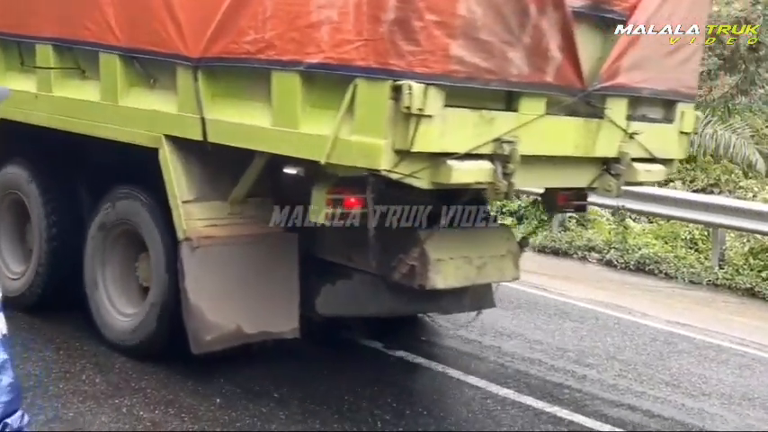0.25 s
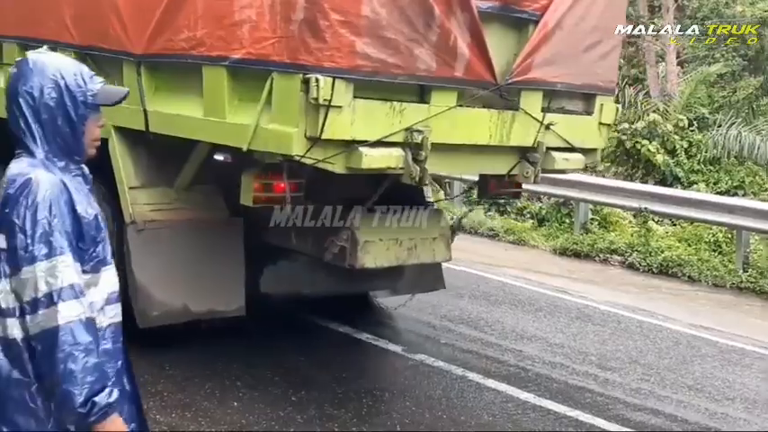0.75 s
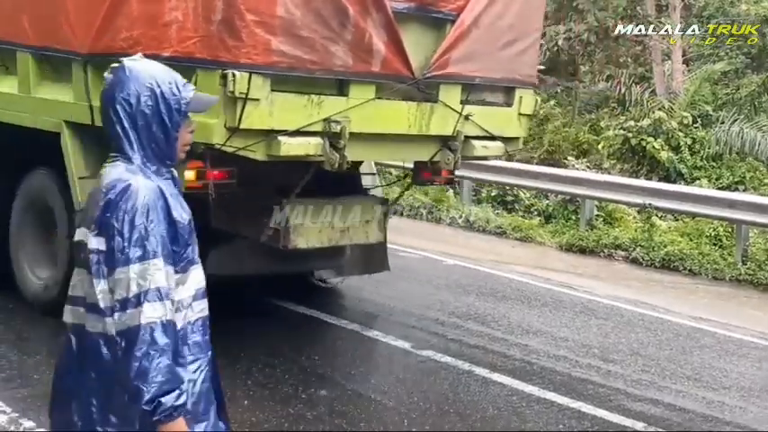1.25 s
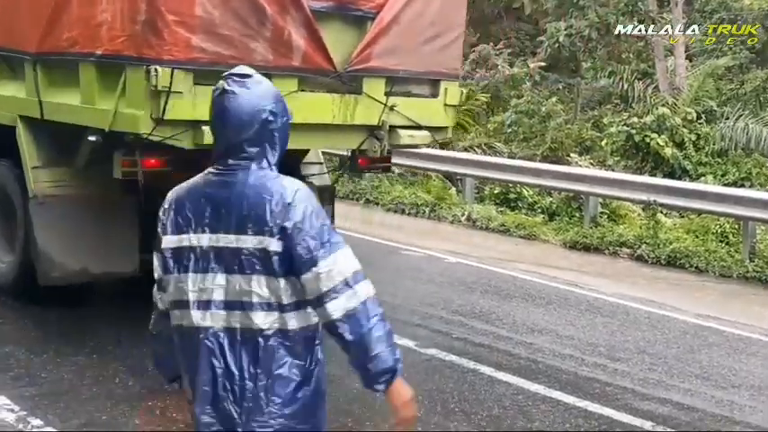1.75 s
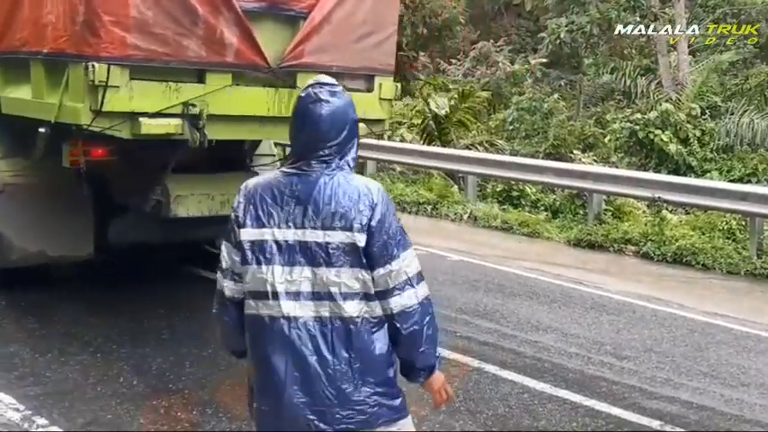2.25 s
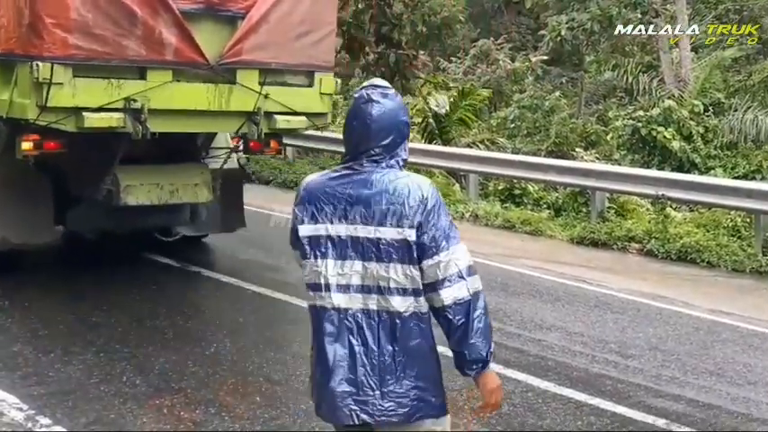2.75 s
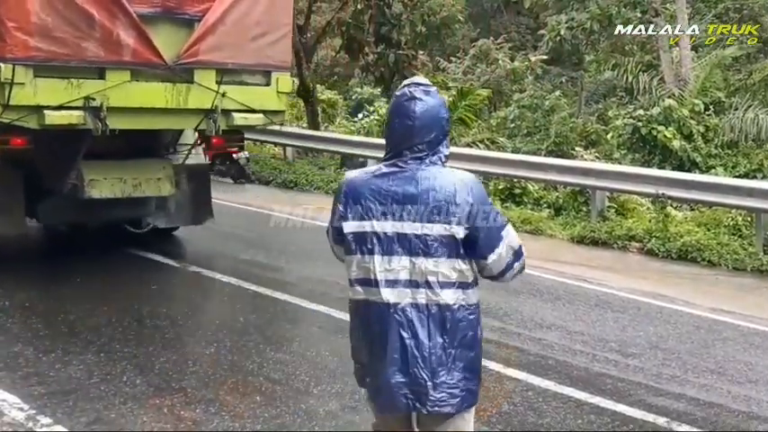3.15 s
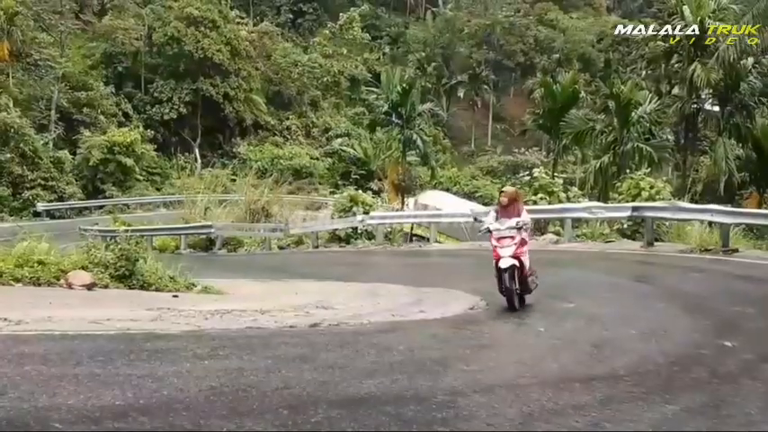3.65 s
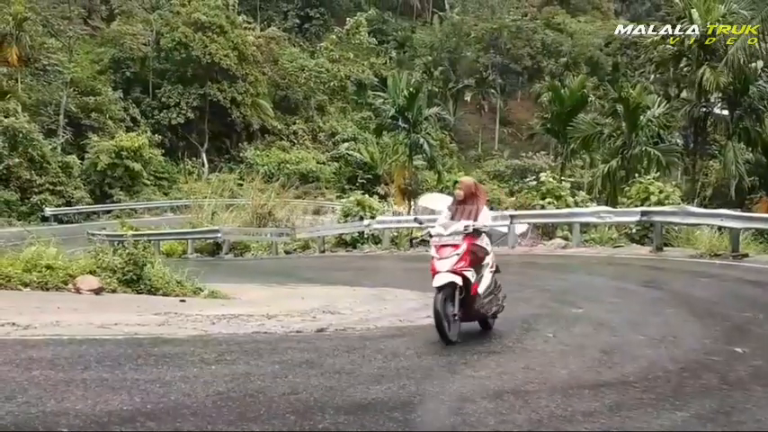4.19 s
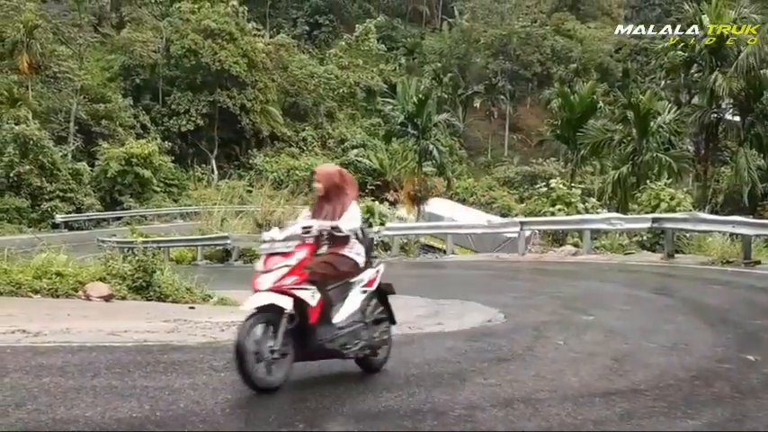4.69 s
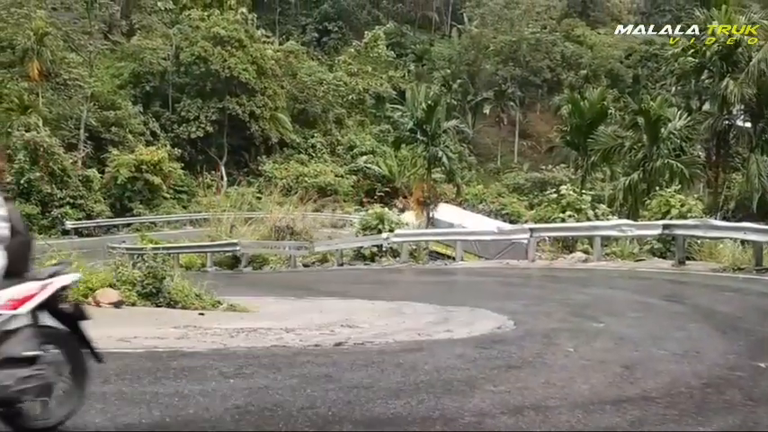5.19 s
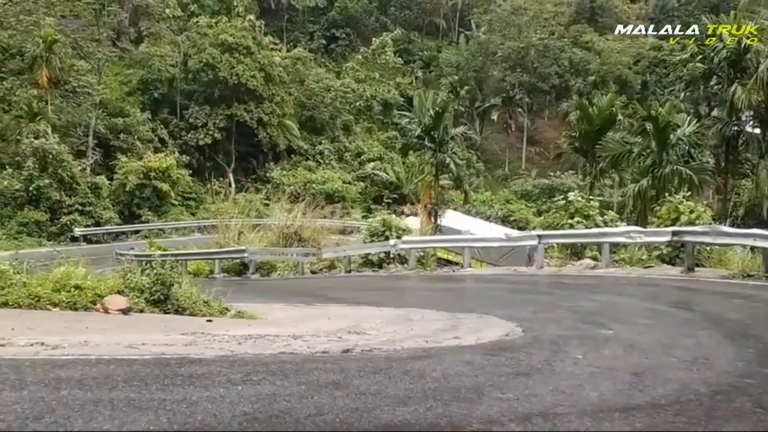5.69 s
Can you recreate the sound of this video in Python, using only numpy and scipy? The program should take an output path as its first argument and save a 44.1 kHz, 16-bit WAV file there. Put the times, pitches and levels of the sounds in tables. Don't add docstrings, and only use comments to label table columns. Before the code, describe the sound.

A stereo roadside pickup catches a loaded truck's steady low boom and gritty, fluttering engine roar, its deep boom fading as it climbs, with a tiny buzzing beep around the middle. Then the level suddenly falls: a distant low drone, thin insect chirps, and a single-cylinder scooter growing nearer, with light belt ticks, wet-road noise and a rising airy whoosh at the pass.

```python
import sys
import numpy as np
from scipy import signal
from scipy.io import wavfile
from scipy.ndimage import uniform_filter1d, map_coordinates

SR = 44100
rng = np.random.default_rng(int(sys.argv[2]) if len(sys.argv) > 2 else 0)


def how_loud(loudness_db):
    steps = np.asarray(loudness_db, float) / 20
    return 10 ** steps


def transcribe(signal):
    frames = np.atleast_2d(signal).T
    limited = np.clip(frames, -1, 1)
    pcm = np.round(limited * 32767).astype(np.int16)
    wavfile.write(sys.argv[1], SR, pcm)


N = 261506
T = np.arange(N) / SR
FRAME_S = np.arange(N // 256 + 5) * 256 / SR
HZ = np.fft.rfftfreq(1024, 1 / SR)
CUT_S = 3.323

# (time [s], firing rate [Hz], boom level [dB])
TRUCK_EXHAUST = [
    (0.1, 81.3, -16.6),
    (0.4, 82.2, -16.9),
    (0.7, 81.9, -16.8),
    (1.3, 83.2, -19.0),
    (1.9, 83.6, -20.1),
    (2.5, 85.0, -21.7),
    (2.8, 84.8, -22.2),
    (3.1, 85.3, -22.5),
]
# (multiple of the cam turn, level [dB])
TRUCK_ORDERS = [(1, -63), (2, -50), (3, -48), (4, -33), (5, -44.5), (7, -33), (8, -39), (9, -21.5),
                (10, -23), (11, -20), (12, -17), (13, -17.5), (14, -25), (15, -30), (16, -23), (17, -51.5),
                (18, -17), (19, -29), (20, -36.5), (21, -31), (22, -44), (23, -30), (24, -22), (25, -27.5),
                (26, -32), (27, -38), (28, -24.5), (29, -46), (30, -43), (31, -36),
                (36, -30.5), (42, -28), (48, -29.5), (51, -21.5), (54, -19), (56, -22), (60, -26),
               (63, -31.5), (69, -32)]
# (frequency [Hz], level per Hz [dB])
TRUCK_ROAR = [(280, -43), (470, -18), (498, -4.5), (611, -7.5), (760, -1.5), (867, -1.5), (1060, -8.5),
              (1420, -4), (1690, -5), (2020, -3.5), (3080, -12.5), (5520, -14), (7280, -24.5),
              (8790, -18.5), (15300, -26.5)]
# (frequency [Hz], level per Hz [dB])
TRUCK_GROWL = [(15, -32), (30, -14), (60, -18), (100, -8.5), (180, 0.5), (260, -5), (400, -5.5),
               (450, -20.5), (600, -41)]
# (frequency [Hz], width [Hz], lift [dB])
TRUCK_PANELS = [
    (786, 490, 2.5),
    (1467, 76, 3.5),
    (1870, 160, 2),
]
# (frequency [Hz], likeness [0-1])
HILL_SAME = [(30, .8), (100, .97), (260, .95), (390, .87), (520, .75), (650, .9), (780, .95), (900, .9),
             (1030, .8), (1200, .55), (1420, .65), (1640, .55), (2000, .35), (15000, .15)]
# (frequency [Hz], lead of left [rad])
HILL_LEAD = [(0, 0), (260, .4), (650, .35), (900, .7), (1030, 1.6), (1200, 1.1), (1420, 1.3), (1640, 2.6),
             (2000, 4.3), (2800, 7.8), (15000, 35)]
# (frequency [Hz], left over right [dB])
HILL_PAN = [(60, -2.0), (92, -2.0), (140, -1.0), (210, -1.5), (330, -2.0), (500, -1.5), (770, -3.0),
            (1170, -4.5), (1790, -7.5), (2740, -3.0), (4190, -4.0), (6410, -5.5), (9810, -1.0),
            (15000, 1.0)]
# (time [s], firing rate [Hz], boom level [dB])
SCOOTER_EXHAUST = [
    (3.32, 36.6, -45.5),
    (3.55, 37.14, -44.1),
    (3.75, 38.83, -36.3),
    (4.0, 39.59, -34.4),
    (4.3, 37.97, -37.1),
    (4.7, 37.54, -39.3),
    (5.05, 36.78, -31.9),
    (5.3, 37.56, -28.4),
    (5.6, 38.52, -29.5),
    (5.93, 38.29, -27.9),
]
# (frequency [Hz], level [dB])
MUFFLER = [(100, -5.5), (155, -4), (195, -4), (235, 2), (275, -4.5), (320, -8.5), (450, -14.5), (600, -14),
           (680, -10), (760, -14.5), (880, -13), (1100, -34)]
# (time [s], nearness [0 far, 1 bend, 2 passing])
APPROACH = [
    (3.3, 0.19),
    (3.8, .4),
    (4.3, 0.85),
    (4.6, 0.93),
    (4.9, 1.1),
    (5.2, 1.42),
    (5.6, 1.67),
    (5.93, 2.02),
]
# (frequency [Hz], level per Hz [dB])
ROAD_FAR = [(250, -43), (430, -20), (492, 1), (555, -25), (685, -3), (749, -17), (1140, -18), (1730, -11.5),
            (1900, -20), (2380, -11.5), (2890, -21), (5850, -31.5), (9590, -28), (15500, -55)]
ROAD_BEND = [(250, -22), (430, -19), (616, 2.5), (760, -7.5), (1040, -0.5), (1290, -10.5), (1870, -5.5),
             (2170, -11), (2520, -9), (3670, -20), (5940, -13), (8130, -26.5), (11000, -21), (15500, -33)]
ROAD_NEAR = [(250, -30), (430, -6), (520, -13), (670, -1), (800, -9), (1150, -12.5), (1500, -3),
             (2500, -13), (3400, -12.5), (5260, -12), (7110, -27.5), (8640, -10.5), (11300, -17),
             (15500, -26)]
# (frequency [Hz], level per Hz [dB])
LOW_WASH = [(15, -30), (30, -16), (60, -9), (100, 2), (200, -4), (300, 3.5), (420, -4.5), (600, -28.5)]
# (frequency [Hz], likeness [0-1])
BEND_SAME = [(60, .9), (350, .94), (650, .89), (780, .8), (1030, .68), (1200, .52), (1420, .6), (1640, .4),
             (2000, .15), (15000, .15)]
# (frequency [Hz], lead of left [rad])
BEND_LEAD = [(0, 0), (390, .25), (780, .4), (1030, 1.2), (1420, 1.9), (1640, 2.7), (2400, 5.8), (15000, 30)]
# (frequency [Hz], left over right [dB])
BEND_PAN = [(60, -1.5), (92, -1.5), (140, -1.5), (210, -1.5), (330, -2.5), (500, -1.5), (770, -1.5),
            (1170, -4.5), (1790, -7.5), (2740, -7.0), (4190, -4.5), (6410, -6.0), (9810, -2.0),
            (15000, 0.5)]
# (overtone, start [s], hold [s], level [dB])
HORN_SWELLS = [
    (9, 1.527, .015, -42),
    (9, 1.556, .03, -30.5),
    (9, 1.59, .055, -34),
    (9, 1.652, .04, -29.5),
    (9, 1.73, .1, -46),
    (8, 1.527, .06, -43),
    (8, 1.665, .05, -43),
    (8, 1.758, .012, -45),
    (10, 1.545, .035, -42),
    (10, 1.662, .095, -42),
]
# (time [s], level [dB])
BELT_TICKS = [
    (4.2694, -28),
    (4.4443, -26),
    (4.5094, -36),
    (4.5825, -30),
    (5.3058, -27),
    (5.3597, -13),
    (5.3994, -31),
]
# (time [s], firing rate [Hz], level [dB])
FAR_ENGINE = [
    (3.32, 76.25, -33.1),
    (3.8, 75.24, -28.9),
    (4.3, 75.13, -31.0),
    (4.8, 74.86, -34.6),
    (5.3, 74.78, -33.2),
    (5.93, 77.0, -41.8),
]

SHADE_S, SHADE_HALF_S = 1.54, 1.43
BOOM_TURNS = .77


def truck():
    firing_hz, boom_db = curves(TRUCK_EXHAUST)
    turns = np.cumsum(firing_hz / 6) / SR
    boom = np.sqrt(2) * how_loud(boom_db) * np.sin(2 * np.pi * 6 * turns)
    rumble = np.zeros(N)
    for k, db in TRUCK_ORDERS:
        level = how_loud(db + 2 * wander(3))
        drift = (.45 if k % 6 else .2) * wander(6)
        rumble += level * np.sin(2 * np.pi * (k * turns + rng.random()) + drift)
    rumble_db = -26 + 0.21 * (boom_db - boom_db[0])
    tones = boom + how_loud(rumble_db) * evened(rumble)
    firing_puff = 0.02 * np.cos(2 * np.pi * 6 * turns - 1.1)
    cam_puff = 0.037 * np.cos(2 * np.pi * turns)
    puffs = 1 + firing_puff + cam_puff + 0.039 * wander(41.3)
    return ports(tones, -2.1, 4) + truck_roar() * puffs


def truck_roar():
    shade = np.exp(-((FRAME_S - SHADE_S) / SHADE_HALF_S) ** 2)
    roar_db = -24.5 - 3.5 * shade
    tilt_db = -0.73 + 1.12 * shade
    boom_db = curves(TRUCK_EXHAUST, FRAME_S)[1]
    growl_db = -29.5 + 0.29 * (boom_db - boom_db[0])
    climb = 1 + 0.024 * (FRAME_S - SHADE_S)
    rings_db = 0
    for hz, width, db in TRUCK_PANELS:
        rings_db = rings_db + db / (1 + ((HZ[:, None] - hz * climb) * 2 / width) ** 2)
    engine = unit(TRUCK_ROAR) + rings_db + roar_db + tilt_db * np.log2(HZ / 1000 + .1)[:, None]
    field_db = mixed(engine, unit(TRUCK_GROWL) + growl_db)
    return noise(field_db, HILL_SAME, HILL_LEAD, HILL_PAN, patchy_db=0.89, flicker_db=0.33)


def scooter():
    hz, boom_db = curves(SCOOTER_EXHAUST)
    turns = np.cumsum(hz * (T > CUT_S)) / SR
    near = curves(APPROACH)[0]
    exhaust = scooter_overtones(turns, near)
    boom = np.sqrt(2) * how_loud(boom_db) * np.cos(2 * np.pi * (2 * turns + BOOM_TURNS))
    tones = boom + how_loud(-37.5 + 0.84 * near) * exhaust
    puffs = 1 + (0.039 + 0.048 * near) * np.sqrt(2) * np.cos(2 * np.pi * turns)
    return ports(tones, -1.6, 2) + (road_noise() + whoosh()) * puffs


def scooter_overtones(turns, near):
    exhaust = np.zeros(N)
    for k in range(3, 29):
        db = read(MUFFLER, k * 38) + 1.5 * wander(3)
        if k < 6:
            db = db + 7 * ramp(near, 1.1, 1.9)
        if k == 6:
            db = db + 7.5 * ramp(T, 5.13, 5.28)
        if k in (7, 8):
            db = db + 3.5 * np.exp(-((near - 1) / 0.47) ** 2)
        if k in (9, 10, 11):
            db = db - 1 + 12 * ramp(near, 1.5, 1.72)
        high = k > 8
        scatter = (.15 + .015 * k * high) * wander(5) + high * 2 * np.pi * rng.random()
        exhaust -= how_loud(db) * np.cos(2 * np.pi * k * turns + scatter)
    return exhaust


def road_noise():
    near = curves(APPROACH, FRAME_S)[0]
    pass_s, pass_half_s = 5.46, 0.37
    pass_db = -28 - 10 * np.log10(1 + ((FRAME_S - pass_s) / pass_half_s) ** 2)
    road_db = mixed(-39.5, pass_db)
    colour = 0
    for place, spectrum in enumerate((ROAD_FAR, ROAD_BEND, ROAD_NEAR)):
        share = np.clip(1 - abs(np.clip(near, 0, 2) - place), 0, 1)
        colour = colour + share * unit(spectrum)
    wash = unit(LOW_WASH) - 41.5 + 4 * near
    return noise(mixed(colour + road_db, wash), BEND_SAME, BEND_LEAD, BEND_PAN, patchy_db=1.73, flicker_db=0.5)


def whoosh():
    wake_s, loud_s, high_s = 5.15, 5.32, 5.55
    band_hz = 1680 + 450 * ramp(T, wake_s, high_s)
    air = rng.standard_normal((2, N))
    spread = ramp(T, loud_s - .05, high_s)
    narrow, wide = (evened(resonate(resonate(air, band_hz, w), band_hz, 1.5 * w)) for w in (230, 520))
    band = (1 - spread) * narrow + spread * wide
    band = band * how_loud([[-4], [4.5]]) * how_loud(1.5 * wander(12))
    return band * how_loud(-47 + 14.5 * ramp(T, wake_s - .1, loud_s))


def horn():
    hz = 3377 + 150 * np.clip(T - 1.52, 0, .26)
    turns = np.cumsum(hz / 9) / SR
    attack_s, release_s = .022, .03
    power = np.zeros((3, N))
    for k, start, hold, db in HORN_SWELLS:
        rise = ramp(T, start - attack_s / 2, start + attack_s)
        fall = np.exp(-2 * np.maximum(T - start - hold, 0) / release_s)
        power[round(k) - 8] += (how_loud(db) * rise * fall) ** 2
    beep = np.zeros(N)
    for k, p in zip((8, 9, 10), power):
        beep += np.sqrt(2 * p) * how_loud(.6 * wander(45)) * np.sin(2 * np.pi * k * turns)
    pan_db = -7.5 + 60 * np.clip(T - 1.68, 0, .12)
    return ports(beep, pan_db, 24) * how_loud(3.5)


def ticks():
    out = np.zeros(N)
    for s, db in BELT_TICKS:
        out += how_loud(db - 7) * (T > s) * np.exp(-np.maximum(T - s, 0) / .003)
    return resonate(out * rng.standard_normal((2, N)), 12000, 5000)


def far_engine():
    hz, db = curves(FAR_ENGINE)
    turns = np.cumsum(hz * (T > CUT_S)) / SR + BOOM_TURNS - .23
    boom = np.sqrt(2) * how_loud(db + .8 * wander(9)) * np.cos(2 * np.pi * turns + .1 * wander(7))
    return ports(boom, -1.6, 2)


def cricket():
    ring_hz, width_hz, stroke_hz, chirp_s = 9500, 760, 124, .1365
    strokes = np.exp(-(T * stroke_hz % 1) / .35)
    place = (T - 3.465) / chirp_s % 1
    chirp = np.sqrt(np.clip(np.sin(np.pi * place) - .15, 0, 1)) * how_loud(.8 * wander(18.0))
    scrape = rng.standard_normal((2, N))
    scrape = (scrape + 1.8 * scrape[::-1]) * strokes * chirp
    ring = resonate(resonate(scrape, ring_hz, width_hz), ring_hz, width_hz)
    return how_loud(-56 - 0.4 * (T - CUT_S) ** 2) * evened(ring)


def noise(field_db, same, lead, pan, patchy_db, flicker_db):
    a, b, c, d, patches = rng.standard_normal((len(FRAME_S), len(HZ), 5)).T
    flicker = evened(uniform_filter1d(patches[:40].mean(0), size=3))
    patches = uniform_filter1d(uniform_filter1d(patches, size=10, axis=0), size=12, axis=1)
    level = how_loud(field_db + patchy_db * evened(patches) + flicker_db * flicker)
    like = np.clip(read(same, HZ), -1, 1)[:, None]
    left = a + 1j * b
    delayed = left * np.exp(-1j * read(lead, HZ))[:, None]
    right = like * delayed + np.sqrt(1 - like ** 2) * (c + 1j * d)
    half = how_loud(read(pan, HZ) / 2)[:, None]
    z = np.array([left * half, right / half]) * level
    return signal.istft(z, nperseg=1024, noverlap=768)[1][:, :N] * np.sqrt(3 / 2)


def ports(x, pan_db, lag):
    return np.array([np.roll(x, lag) * how_loud(pan_db / 2), x / how_loud(pan_db / 2)])


def resonate(x, hz, width):
    turn = np.exp(2j * np.pi * np.cumsum(hz * np.ones(x.shape[-1])) / SR)
    r = np.exp(-np.pi * width / SR)
    return 2 * (turn * signal.lfilter([1 - r], [1, -r], x / turn)).real


def wander(per_s):
    knots = rng.standard_normal(400)
    return np.interp(T, FRAME_S, evened(map_coordinates(knots, [FRAME_S * per_s], order=3)))


def unit(points):
    db = read(points, HZ)
    return (db - 10 * np.log10(np.sum(how_loud(2 * db))))[:, None]


def mixed(*fields_db):
    return 10 * np.log10(sum(how_loud(2 * f) for f in fields_db))


def evened(x):
    return x / np.sqrt(np.mean(x ** 2) + 1e-20)


def read(points, hz):
    f, value = np.transpose(points)
    return np.interp(np.log(hz + 1), np.log(f + 1), value)


def curves(rows, t=T):
    s, *columns = np.transpose(rows)
    return [np.interp(t, s, c) for c in columns]


def ramp(x, low, high):
    return np.clip((x - low) / (high - low), 0, 1)


def scene():
    after = np.clip((T - CUT_S) / 0.0069 + .5, 0, 1)
    hill = truck() + horn()
    bend = scooter() + far_engine() + cricket() + ticks()
    return hill * (1 - after) + bend * after


def roll_off(x):
    return signal.sosfilt(signal.butter(12, 15670, fs=SR, output="sos"), x)


def record(dry):
    edge = signal.firwin2(511, [0, 14300, 15050, 15300, 15600, SR / 2], [1, 1, 1.7, 1.0, 0, 0], fs=SR)
    mix = signal.oaconvolve(dry, edge[None], "same", axes=1)
    return roll_off(mix)


dry = scene()
out = record(dry)
transcribe(out)
```